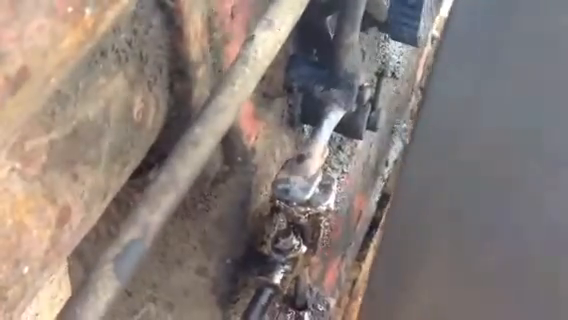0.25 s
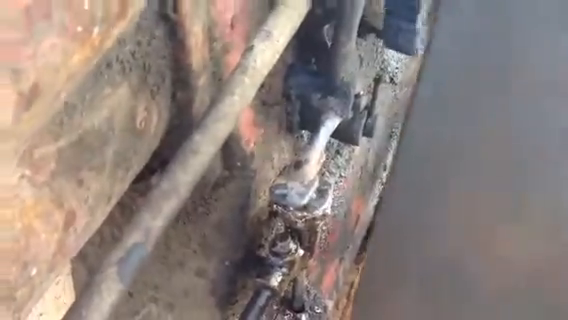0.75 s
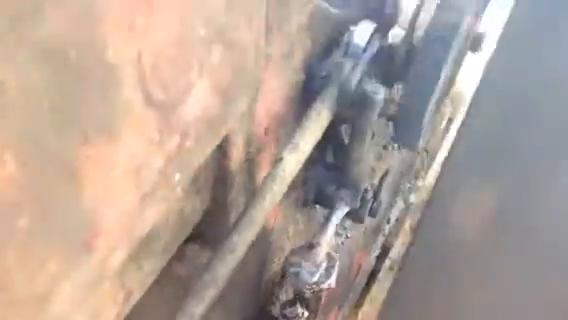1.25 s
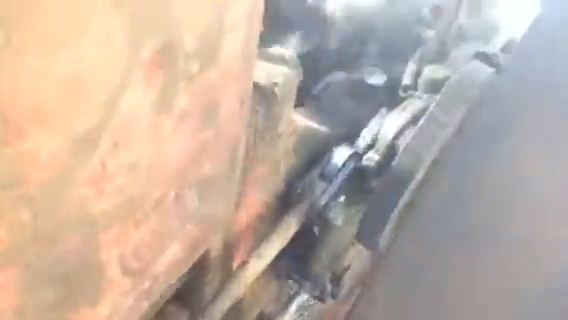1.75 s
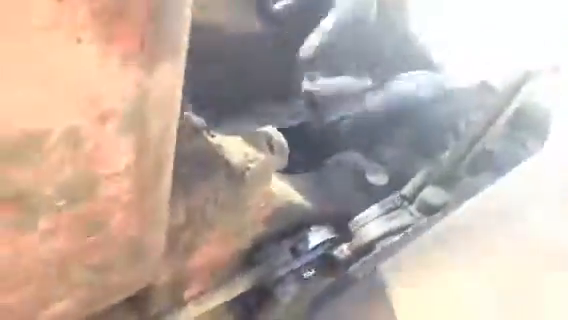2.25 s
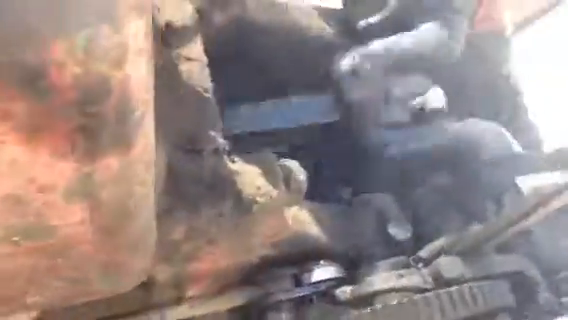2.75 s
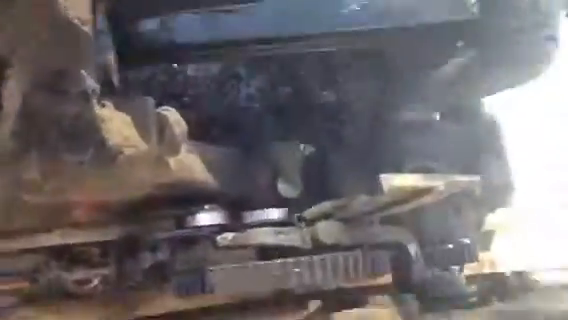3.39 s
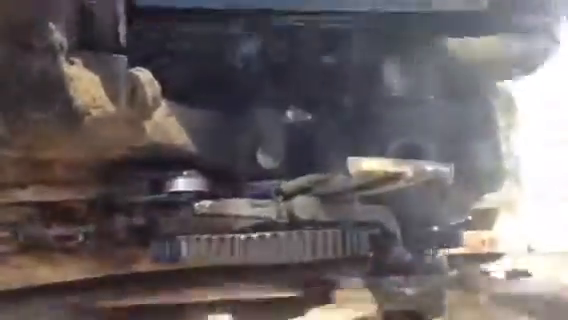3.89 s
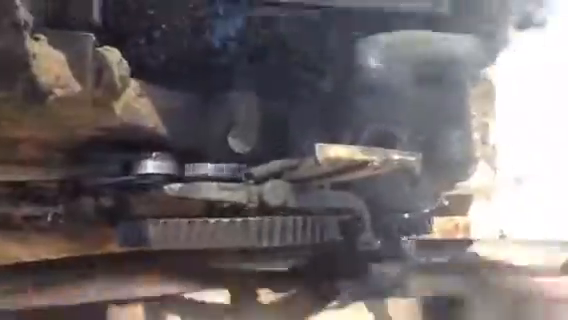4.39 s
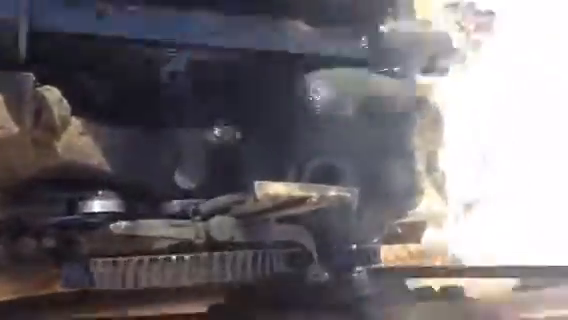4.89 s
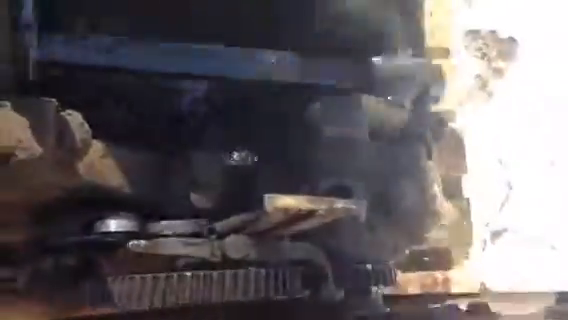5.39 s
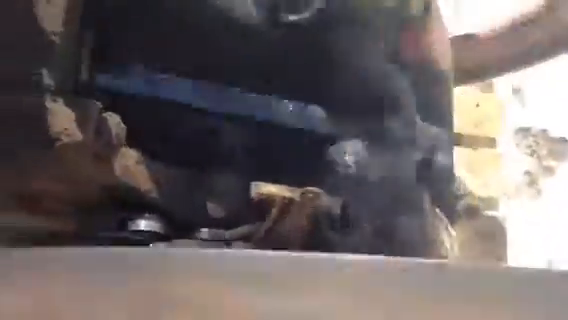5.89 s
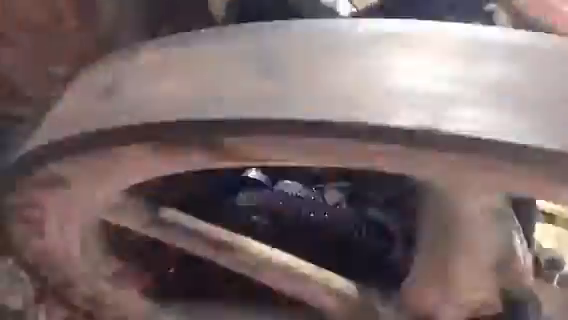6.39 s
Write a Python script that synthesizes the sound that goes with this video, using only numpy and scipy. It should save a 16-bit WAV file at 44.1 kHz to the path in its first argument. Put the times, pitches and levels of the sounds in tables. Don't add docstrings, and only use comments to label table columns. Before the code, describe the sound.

A handheld microphone passes very near heavy, worn machinery in open air. Deep knocks alternate with looser metal clunks, while sharp clacks, steel snaps and bell-like pawl pings come every other turn. Loose parts chatter and tick irregularly between, with soft puffs of leaking air. Early blows ring in a hollow iron hopper; later ones sound drier and boomier, with flywheel draught popping and buffeting. There is little echo, and the pace gradually eases.

```python
import sys
import numpy as np
from scipy import signal
from scipy.fft import rfft, irfft, next_fast_len
from scipy.io import wavfile
from scipy.ndimage import uniform_filter1d

SR = 44100
rng = np.random.default_rng(int(sys.argv[2]) if len(sys.argv) > 2 else 0)


def boost_factor(decibels):
    exponent = np.asarray(decibels, float) / 20
    return 10 ** exponent


def int16_out(signal):
    q = np.round(np.clip(np.atleast_2d(signal).T, -1, 1) * 32767)
    wavfile.write(sys.argv[1], SR, q.astype(np.int16))


N = 292824

EDGES = 28 * 2 ** np.arange(0, 9.4, 1 / 3)
CENTRES = np.sqrt(EDGES[1:] * EDGES[:-1])


def at_hz(points, hz):
    table = np.array(points)
    return np.interp(np.log(hz), np.log(table[:, 0]), table[:, 1])


def in_time(rows):
    s, *columns = np.transpose(rows)
    return [np.interp(np.arange(N) / SR, s, c) for c in columns]


def later(rows, lag_s):
    return np.array(rows)[:, :1] + lag_s


def rms_one(x):
    return x / np.sqrt(np.mean(x ** 2) + 1e-20)


def drift(rate):
    r = np.exp(-40 * np.pi * rate / SR)
    chance = rng.standard_normal(N // 20 + 2002)
    slow = signal.lfilter([1], [1, -2 * r, r * r], chance)[2000:]
    return np.interp(np.arange(N) / 20, np.arange(len(slow)), rms_one(slow))


def clicks(rows, db):
    out = np.zeros(N)
    out[(np.array(rows)[:, 0] * SR).astype(int)] = boost_factor(db)
    return out + 1e-18


def swell(x, rise_s, t60):
    a, r = np.exp(-1 / (max(rise_s, 1e-4) * SR)), boost_factor(-60 / (t60 * SR))
    return signal.lfilter([1 - a], np.convolve([1, -a], [1, -r]), x)


def one_band(noise, k):
    sos = signal.butter(2, EDGES[k:k + 2], "band", fs=SR, output="sos")
    return rms_one(signal.sosfilt(sos, noise))


def resonate(air, hz, width_hz):
    r = np.exp(-np.pi * width_hz / SR)
    for _ in range(2):
        air = signal.lfilter([1, 0, -1], [1, -2 * r * np.cos(2 * np.pi * hz / SR), r * r], air)
    return air


def whistle(start, end, hz, db, sharpness):
    i, k = int(start * SR), int(end * SR)
    out = np.zeros(N)
    air = resonate(rng.standard_normal(SR // 2), hz, hz / sharpness)
    out[i:k] = boost_factor(db) * rms_one(air[i - k:]) * np.sin(np.linspace(0, np.pi, k - i))
    return out


def is_inside(colour):
    return (CENTRES > colour[0][0]) & (CENTRES < colour[-1][0])


def shares_db(colour):
    db = at_hz(colour, CENTRES) + 10 * np.log10(np.diff(EDGES)) - 80 * ~is_inside(colour)
    return db - 10 * np.log10(np.sum(boost_factor(2 * db)))


def strike(rows, db, modes, spread_db, contact_s):
    out = 0
    for hz, level_db, t60 in modes:
        r, w = boost_factor(-60 / (t60 * SR)), 2 * np.pi * hz / SR
        soft = np.exp(-1 / (max(contact_s, 1 / hz) * SR))
        luck_db = spread_db * np.clip(rng.standard_normal(len(rows)), -2, 2)
        blow = clicks(rows, db + level_db + luck_db)
        contact = [(1 - soft ** 2) / 2, 0, (soft ** 2 - 1) / 2]
        blow = signal.lfilter(contact, [1, -2 * soft * np.cos(w), soft ** 2], blow)
        out = out + signal.lfilter([0, np.sin(w)], [1, -2 * r * np.cos(w), r * r], blow)
    return out


# (pitch [Hz], t60 [s])
IRON_T60 = [(80, 0.044), (300, 0.14), (800, 0.16), (2000, 0.091), (5000, 0.046), (14000, 0.064)]


def clatter(rows, knots_hz, colour, level_db, rise_s, length, touches):
    own = np.array(rows)[:, 1:]
    lags, losses_db = np.transpose([(0, 0), *touches])
    times = np.clip(later(rows, lags), 0, (N - 1) / SR).reshape(-1, 1)
    usual_db = level_db + shares_db(colour)
    bends = np.array([np.interp(np.log(CENTRES), np.log(knots_hz), o) for o in own - own.mean(axis=0)])
    power = np.zeros((len(CENTRES), N))
    for k in np.flatnonzero(is_inside(colour)):
        db = (usual_db[k] + bends[:, k, None] + losses_db).ravel()
        power[k] = swell(clicks(times, db), rise_s, length * at_hz(IRON_T60, CENTRES[k])) ** 2
    return power


def bands(grit_db, depth_db):
    grain = np.minimum(rng.exponential(1, (2, N)), 5)
    white = rng.standard_normal((2, N)) * boost_factor(grit_db * grain)
    size = next_fast_len(N)
    knots = 14 * np.arange(0, 95, .5) ** 1.6
    heights = np.minimum(rng.exponential(1, len(knots)), 2.5) / (1 + knots / 3500)
    peaks_db = depth_db * np.interp(np.arange(size // 2 + 1) * SR / size, knots, heights)
    white = irfft(rfft(white, size) * boost_factor(peaks_db), size)[:, :N]
    return [one_band(white[k % 2], k) for k in range(len(CENTRES))]


def iron(contacts, teeth):
    ragged = drift(220)
    power = teeth.copy()
    for k in range(len(CENTRES)):
        touch = .6 * ragged + .8 * np.roll(ragged, 5000 * (k + 1))
        power[k] += contacts[k] * boost_factor(2 * 4.2 * np.clip(touch, -2, 2))
    return np.sum(np.sqrt(power) * bands(grit_db=1.5, depth_db=9.0), axis=0)


# (share of cycle, level [dB])
SLIDING = [(0, 1), (.1, -3.5), (.2, 4.5), (.3, 2.5), (.4, 0), (.47, 3.5), (.55, 10.5), (.65, -1),
           (.75, 2.5), (.85, -1), (.93, 3), (1, 9)]
# (pitch [Hz], level [dB per Hz])
RATTLE = [(24, -54), (40, -19), (162, 10.5), (241, 6), (333, 6.5), (562, 1.5), (881, -6), (2010, -6),
          (2640, -13.5), (5440, -18.5), (6320, -23), (14400, -35.5), (15500, -53)]


def gear_teeth(rattle_db):
    knock_s = np.array(KNOCKS)[:, 0]
    turns = np.interp(np.arange(N) / SR, [-.16, *knock_s, 6.67], np.arange(len(KNOCKS) + 2))
    teeth_db = 1.6 * drift(25) + np.interp(turns / 2 % 1, *np.transpose(SLIDING))
    stray = clicks([(s, 0) for s in rng.uniform(0, N / SR, 400)], rng.normal(0, 4, 400))
    total = boost_factor(2 * teeth_db) + swell(stray, .0005, .025) ** 2
    power = np.zeros((len(CENTRES), N))
    for k, db in enumerate(shares_db(RATTLE)):
        patches_db = 2.5 * drift(12)
        power[k] = total * boost_factor(2 * (rattle_db + 7.0 + db + patches_db))
    return power


# (pitch [Hz], level [dB], t60 [s])
HOPPER = [(520, -10, 0.38), (575, 4.5, 0.25), (605, -23, 0.38), (647.3, -2.5, 0.22), (691.5, -7.5, 0.21),
          (706, -12.5, 0.17), (1847, -5.5, 0.085)]
# (pitch [Hz], level [dB], t60 [s])
HOPPER_LID = [(641, 4.5, 0.17), (794, -28, .25)]


def water_hopper(hum_db):
    knocks, returns, clacks = map(np.array, (KNOCKS, RETURNS, CLACKS))
    lag_s = .008
    blows = np.concatenate([knocks[:, [0, 2]], returns[:, :2] - [0, 4], clacks[:, :2] + [lag_s, -3.5]])
    near_db = .4 * (hum_db[(blows[:, 0] * SR).astype(int)] + 33)
    out = strike(blows, blows[:, 1] + near_db + 4.5, HOPPER, 1, 0.0022)
    shaken = [(s, 0) for s in rng.uniform(0, N / SR, 600)]
    out += boost_factor(hum_db - 8.5) * rms_one(strike(shaken, 0, HOPPER, 4.0, 0.0025))
    return out + strike(later(clacks[:3], lag_s), clacks[:3, 1] + 2.0, HOPPER_LID, 1.4, 0.0027)


# (time [s], level [dB] near 6000 Hz)
ROD_IN_VIEW = [(0, -8), (0.5, -10), (1.3, -11.5), (1.9, -5), (2.6, -5), (3.5, 2), (4.4, -1), (5.9, -0.5),
               (6.4, -6.5)]


def rod_view_db():
    return np.interp(np.array(RETURNS)[:, 0], *np.transpose(ROD_IN_VIEW))


# (time [s], peak level [dB])
PINS = [(0.0094, -15.5), (0.419, -21.5), (0.834, -19.5), (1.257, -19), (1.6873, -17.5), (2.12, -18),
        (2.561, -16.5), (3.0086, -16), (3.461, -17), (3.923, -17.5), (4.3921, -18.5), (4.8686, -18),
        (5.3524, -18), (5.8443, -17.5), (6.3473, -18)]
# (pitch [Hz], level [dB per Hz])
PIN_COLOUR = [(410, -32), (700, -26), (1160, 0), (1500, 0), (2710, -4.5), (3570, -9.5), (3850, -13.5),
              (5330, -10.5), (6440, -25), (14000, -67)]
# (pitch [Hz], level [dB], t60 [s])
PIN = [(1483, 2.5, 0.034), (2045, 3, 0.024), (2530, -18, 0.018), (3580, -3, 0.023), (4160, -10.5, 0.027)]


def wrist_pin():
    s, db = np.transpose(PINS)
    rows = np.transpose([s, db - np.mean(db), rod_view_db()])
    power = clatter(rows, [1600, 6000], PIN_COLOUR, -28.0, 0.0014, 1.0, [(.007, -13)])
    ring = strike(PINS, db - 3.0, PIN[:1], 0, 0.0016)
    return power, ring + strike(PINS, db - 6.0, PIN[1:], 2, 0.0017)


# (time [s], level [dB] near 600 Hz, level [dB] near 1600 Hz)
RETURNS = [(0.026, -22, -22), (0.4385, -24.5, -24.5), (0.855, -22.5, -21), (1.276, -20.5, -18.5),
           (1.709, -24, -19), (2.145, -23, -19.5), (2.585, -24.5, -15.5), (3.032, -24, -16),
           (3.486, -26, -17), (3.949, -21, -19.5), (4.42, -37, -19.5), (4.895, -26, -22), (5.379, -23, -23),
           (5.873, -24, -23.5), (6.375, -23.5, -25)]
# (pitch [Hz], level [dB per Hz])
RETURN_COLOUR = [(47, -69), (80, 1.5), (226, 3.5), (572, -3.5), (900, -13.5), (1170, 7.5), (1300, -5.5),
                 (1510, -4.5), (3080, -13.5), (4270, -16.5), (14000, -55)]
# (pitch [Hz], level [dB], t60 [s])
BED = [(221, -13, 0.046), (257, 1.5, 0.044), (361.8, -4.5, 0.11)]
# (pitch [Hz], level [dB], t60 [s])
ROD = [(1131, 0.5, 0.071), (1522, -2, 0.031), (1942, -6, 0.055), (2310, -16.5, 0.024), (666, -9, 0.065),
       (920, -28, 0.013)]


def rod_return():
    rebound_s, rebound_db = .011, -8.5
    s, low_db, mid_db = np.transpose(RETURNS)
    rows = np.transpose([s, low_db, mid_db, 1.2 * rod_view_db()])
    touches = [(rebound_s, -4), (.021, -9)]
    power = clatter(rows, [600, 1600, 6000], RETURN_COLOUR, -19.5, 0.00082, 0.53, touches)
    ring = strike(RETURNS, low_db + 5.5, BED, 4.5, 0.0025)
    ring += strike(RETURNS, mid_db + 3.1, ROD, 0.87, 0.00045)
    ring += strike(later(RETURNS, rebound_s), mid_db + 3.6 + rebound_db, ROD, 5.4, 0.00033)
    return power, ring


# (length [s], level [dB])
SQUEAKS = [(0.009, -36), (0.011, -40), (0.01, -41), (0.0072, -40), (.045, -43), (0.018, -48), (0.012, -42),
           (0.022, -65)]


def push_rod_squeak():
    return sum(whistle(s - length, s + 0.004, 3100, db, sharpness=90.0)
               for (s, *_), (length, db) in zip(CLACKS, SQUEAKS))


# (time [s], level [dB] near 600 Hz, near 1600 Hz, near 6000 Hz)
CLACKS = [(0.0989, -20, -7.5, -19.5), (0.927, -21, -12, -24), (1.783, -22, -7.5, -21.5),
          (2.659, -21, -9.5, -25.5), (3.563, -21, -11.5, -22.5), (4.494, -26.5, -12, -24),
          (5.457, -24, -16.5, -25.5), (6.451, -29, -14, -29.5)]
# (pitch [Hz], level [dB per Hz])
CLACK_COLOUR = [(150, -21.5), (250, -21.5), (599, -18.5), (1130, -21), (1820, -20), (2060, -16),
                (2800, -20.5), (4150, -20), (4520, -16), (4930, -25), (8970, -33.5), (15000, -82)]
# (pitch [Hz], level [dB], t60 [s])
ROCKER = [(518.8, 0.006, 0.16)]
# (pitch [Hz], level [dB], t60 [s])
VALVE_GEAR = [(1800, -1, .09), (2500, -6, .05), (2870, -4, .06), (5200, -8, .035), (6080, -8, .03),
              (3110, -7, .07), (7150, -8, .03), (8720, -6, .02)]


def valve_clack():
    clacks = np.array(CLACKS)
    power = clatter(CLACKS, [600, 1600, 6000], CLACK_COLOUR, -15.0, 0.0008, 0.93, [(.005, -7)])
    ring = strike(clacks, clacks[:, 1] + 5.2, ROCKER, 0.19, 0.0075)
    ring += strike(later(clacks, .004), clacks[:, 3] + 4.7, VALVE_GEAR, 1.2, 0.00095)
    return power, ring


# (time [s], level [dB])
TRIPS = [(0.1, -39), (0.2643, -15), (1.0968, -15), (1.954, -14), (1.988, -32), (2.8331, -15), (2.847, -26),
         (3.7447, -14.5), (4.6819, -17.5), (5.6504, -26.5), (6.6364, -44)]
# (time [s], level [dB])
LATCH = [(0.1394, -39), (0.5402, -49), (0.9628, -28.5), (1.8163, -29), (2.2523, -28), (2.696, -26.5),
         (3.1408, -26), (3.6032, -23.5), (4.066, -25), (4.5384, -23.5), (5.016, -24), (5.5038, -26.5),
         (5.9935, -26.5), (6.4976, -31.5)]
# (time [s], level [dB])
TAPS = [(0.276, -18.5), (0.3631, -39), (1.85, -31.5), (3.0005, -24), (3.1084, -35), (3.704, -30),
        (0.4945, -47), (5.33, -42), (3.833, -29), (3.8515, -24), (4.339, -36), (4.766, -31), (5.4251, -32),
        (5.752, -36.5), (5.9715, -54), (6.4156, -35)]
# (time [s], level [dB])
FOLLOWER = [(0.308, -37), (0.7255, -38), (1.1418, -31), (1.5675, -30.5), (2.002, -31), (2.4402, -32.5),
            (2.8863, -31), (3.3378, -34.5), (3.797, -27), (4.2614, -35), (4.7356, -37.5), (5.212, -31),
            (5.7078, -40), (6.2043, -39.5)]
# (time [s], level [dB])
LINKS = [(0.5144, -43), (0.9143, -51), (1.031, -39), (3.78, -35), (4.485, -25), (1.0802, -23.5),
         (1.352, -40), (1.389, -32.5), (1.462, -33), (1.901, -34), (2.217, -37.5), (2.5477, -34.5),
         (2.623, -33.5), (2.791, -33), (3.372, -39.5), (3.7275, -18), (4.022, -27), (4.171, -30.5),
         (4.6477, -30), (4.716, -34), (4.959, -32.5), (5.127, -30.5), (5.234, -38), (5.438, -33),
         (5.622, -35), (5.635, -20.5), (5.692, -29.5), (5.927, -39.5), (5.949, -35), (6.119, -32.5),
         (6.188, -33.5), (6.306, -43.5), (6.631, -20)]
# (pitch [Hz], level [dB per Hz])
TICK_COLOUR = [(880, 1.5), (1500, 4), (2940, 4), (4350, 7.5), (5950, 5), (6890, -3.5), (10500, -12),
               (13900, -28), (15500, -40.5)]
# (pitch [Hz], level [dB], t60 [s])
LINK = [(2600, -11, .018), (3250, -7, .02), (3700, -9, .018), (4550, -11, .018), (5200, -9, .016),
        (5750, -7, .018), (6100, -9, .016)]


def small_ticks():
    kinds = [(TRIPS, (-7, 1.5, -13)), (LATCH, (-9.5, 4.5, -9.5)), (FOLLOWER, (-4, 5.5, -10)),
             (LINKS, (-7.5, -3, -27)), (TAPS, (-2, -14, -27.5))]
    rows = np.array([(s, *(db + np.array(tilt))) for table, tilt in kinds for s, db in table])
    power = clatter(rows, [3000, 6000, 11000], TICK_COLOUR, -32.0, 0.00081, 0.73, [(.007, -17.5)])
    return power, strike(LINKS, np.array(LINKS)[:, 1] + 3.0, LINK, 2.5, .001)


# (time [s], peak level [dB] near 8000 Hz, near 3000 Hz)
SNAPS = [(0.101, -13, -14), (.1018, 1, -7.5), (.107, -28, 3), (.1106, -40, -16), (.2626, -15, -25),
         (.2674, -15, -9), (.2748, -23, -29), (.9312, -13, -2.5), (.9356, -33, -10), (1.0956, -25, -36),
         (1.1002, -14, -7), (1.108, -15, -14), (1.7822, -26, -8), (1.7882, -25, 2), (1.9534, -22, -22),
         (1.958, -32, -12), (1.9654, -29, -15), (2.66, -24, -17), (2.6652, -37, -12), (2.8344, -17, -37),
         (2.8398, -25, -21), (2.846, -27, -28), (3.5632, -33, -19), (3.5692, -30, -22),
         (3.7441, -14.5, -25), (3.7494, -12, -8), (4.0666, -16, -34), (4.4955, -9.5, -10),
         (4.5024, -34, -5), (4.681, -15.5, -29), (4.686, -26, -18), (5.4583, -11.5, -8), (5.6503, -24, -16),
         (5.6535, -23, -33), (6.452, -40, -26), (6.6385, -39, -15)]
# (pitch [Hz], level [dB], t60 [s])
SNAP_TOP = [(6470, -9, 0.01), (7400, -4.5, 0.0079), (8850, -3.5, 0.0056), (9370, -4.5, 0.0063),
            (10470, -22, .012), (12400, -24, .012)]
# (pitch [Hz], level [dB], t60 [s])
SNAP_BODY = [(2120, -16, 0.011), (2780, -5.5, 0.013), (3380, -11, 0.013), (3680, -14, 0.0088),
             (5620, -24, 0.0092)]


def steel_snaps():
    _, top_db, body_db = np.transpose(SNAPS)
    return strike(SNAPS, top_db, SNAP_TOP, 1.5, .0002) + strike(SNAPS, body_db, SNAP_BODY, 1.6, 0.00029)


# (time [s], level [dB])
PAWL = [(0.1044, -14), (0.9373, -16.5), (1.0835, -36), (1.788, -13), (2.254, -31), (2.663, -30),
        (3.5717, -16.5), (3.726, -14.5), (4.5008, -22), (4.5416, -25.5), (5.461, -23), (5.622, -35),
        (5.6359, -19.5), (6.456, -41)]
# (pitch [Hz], level [dB], t60 [s])
PAWL_MODES = [(4580, 0, .04), (4440, -5, .03)]


def pawl():
    return strike(PAWL, np.array(PAWL)[:, 1] + 2.0, PAWL_MODES, 1, 0.00038)


# (time [s], level [dB] near 200 Hz, near 600 Hz, near 1600 Hz)
KNOCKS = [(0.252, -21, -20.5, -20.5), (0.678, -19, -20, -21), (1.09, -18.5, -18, -13),
          (1.524, -16, -20.5, -17.5), (1.948, -18, -21, -10), (2.392, -17, -17.5, -18),
          (2.83, -13.5, -16, -17), (3.293, -12, -17, -14), (3.743, -14, -17, -14.5), (4.217, -10, -18, -14),
          (4.68, -12.5, -18.5, -20.5), (5.17, -12, -23.5, -18), (5.649, -14, -21, -16),
          (6.156, -13.5, -22.5, -18.5)]
# (pitch [Hz], level [dB per Hz])
KNOCK_COLOUR = [(35, -76), (60, -63), (140, -31), (225, 4), (325, 1.5), (615, -5.5), (827, -13), (1400, -4),
                (1570, -14), (2060, -11.5), (14000, -55.5)]
# (pitch [Hz], level [dB], t60 [s])
CRANKCASE = [(202, -36, 0.077), (326, -20, 0.2), (569, 3.5, 0.02), (350, -15.5, 0.21), (430, -2, 0.029),
             (1135, -9, 0.088), (1393, -9.5, 0.088), (1293, -27.5, 0.075), (642.7, -19.5, 0.19),
             (1697, -20, 0.098), (2070, -13, 0.049), (2487, -22, 0.057)]
# (pitch [Hz], level [dB], t60 [s])
SKID = [(80, 29.5, 0.0098), (133.3, 17, 0.084)]
# (pitch [Hz], t60 [s])
BOOMS = [(192, 0.14), (192, 0.12), (198.6, 0.16), (188, 0.13), (193.6, 0.18), (190, 0.097), (194, 0.16),
         (192.5, 0.14), (193.2, 0.15), (195.5, 0.086), (196, 0.12), (193, 0.14), (194.6, 0.127),
         (192.4, 0.18)]


def big_end_knock():
    low_db = np.array(KNOCKS)[:, 1]
    touches = [(-.006, -15), (.022, -18.5), (.04, -22.5)]
    power = clatter(KNOCKS, [200, 600, 1600], KNOCK_COLOUR, -12.0, 0.0012, 0.69, touches)
    ring = -strike(KNOCKS, low_db + 5.4, CRANKCASE, 1.0, 0.00066)
    ring += strike(KNOCKS, low_db - 16, SKID, 1.5, .004)
    for (s, db, *_), (hz, t60) in zip(KNOCKS, BOOMS):
        ring += strike([(s + 0.00048,)], db, [(hz - 1.5, 12.5, t60)], 0, .00066)
    t, slap_hz = np.arange(-300, 301) / SR, 437
    slap = -np.cos(2 * np.pi * slap_hz * t) * np.exp(-(2 * slap_hz * t) ** 2)
    ring += np.convolve(clicks(later(KNOCKS, 0.0036), low_db + 6.5), slap, "same")
    return power, ring


# (time [s], peak level [dB])
SEAT = [(0.3642, -33), (0.519, -40), (0.5372, -26.5), (0.563, -35), (1.367, -25), (1.38, -28),
        (2.0672, -33), (2.2233, -43), (2.2514, -31), (3.129, -27.5), (3.856, -25), (4.0316, -35),
        (4.048, -26.5), (4.994, -32), (5.972, -26.5), (5.9864, -40)]
# (pitch [Hz], level [dB], t60 [s])
SEAT_MODES = [(1882, -0.5, 0.055), (1973, -2, 0.047), (1490, -7, 0.033), (2930, -12, 0.038),
              (4500, -15, 0.046)]


def spring_seat():
    return strike(SEAT, np.array(SEAT)[:, 1] - 1.5, SEAT_MODES, 1.8, 0.0012)


LATCH_DROPS_S = [0.542, 1.379, 2.252, 3.141, 4.066, 5.014, 5.994]
# (pitch [Hz], width [Hz], level [dB], lag [s], length [s])
WHEEZE = [
    (1840, 540, -42.5, -0.0047, 0.05),
    (5900, 1800, -55, 0.084, 0.071),
]


def wheeze():
    t, out = np.arange(N) / SR, 0
    for hz, width_hz, db, lag_s, length_s in WHEEZE:
        air = rms_one(resonate(rng.standard_normal(N), hz, width_hz))
        puffs = sum(np.exp(-(2 * (t - s - lag_s) / length_s) ** 2) for s in LATCH_DROPS_S)
        out = out + boost_factor(db + np.clip(drift(20), -2, 2)) * puffs * air
    return out


# (start [s], end [s], level [dB])
DRAUGHT = [(2.131, 2.18, -27.5), (2.335, 2.427, -25.5), (2.396, 2.49, -18.5), (2.488, 2.547, -19),
           (2.585, 2.65, -50), (2.896, 2.905, -29), (2.966, 2.999, -9.5), (3.097, 3.102, -19.5),
           (3.454, 3.54, -23.5), (3.692, 3.733, -15), (3.817, 4.003, -32.5), (4.007, 4.069, -20),
           (4.21, 4.34, -36.5), (4.379, 4.448, -21), (4.427, 4.495, -19.5), (4.493, 4.59, -36),
           (4.89, 4.915, -14), (4.94, 4.999, -20), (5.686, 5.83, -38.5), (5.868, 5.888, -29),
           (6.066, 6.157, -69), (6.452, 6.496, -23)]
# (pitch [Hz], level [dB per Hz])
BUFFET = [(25, 5.5), (50, 3), (100, 6.5), (250, 0), (500, -3), (1000, -29.5), (2000, -23)]


def draught():
    t = np.arange(N) / SR
    gusts = boost_factor(-49.0)
    for start, end, db in DRAUGHT:
        gusts = gusts + boost_factor(db) * np.sin(np.pi * np.clip((t - start) / (end - start), 0, 1))
    white, wind = rng.standard_normal((2, N)), 0
    lumps_db = 4.16 * np.clip(drift(53.0), -2, 2)
    for k, db in enumerate(shares_db(BUFFET)[:19]):
        wind = wind + boost_factor(db + lumps_db * min(CENTRES[k] / 200, 1.5)) * one_band(white[k % 2], k)
    return gusts * rms_one(wind)


# (time [s], peak level [dB], pitch [Hz], push 1 or pull -1)
POPS = [(2.194, -12.5, 241, 1), (2.365, -4.5, 300, 1), (2.431, -20, 260, 1), (2.443, -8, 298, -1),
        (2.5144, -7.5, 306, 1), (2.911, -9.5, 248, 1), (2.979, 2.5, 340, 1), (3.7091, -8, 137, 1),
        (3.722, -21, 250, 1), (4.03, -5.5, 255, 1), (4.045, -11, 263, -1), (4.08, -13.5, 147, 1),
        (4.392, -8, 197, -1), (4.404, -8.5, 350, 1), (4.4851, -5, 346, -1), (4.942, -9, 308, -1),
        (4.972, -1, 388, 1), (5.751, -16, 200, 1)]


def eddy_pops():
    out, t = np.zeros(N), np.arange(-900, 900) / SR
    for s, db, hz, sign in POPS:
        spike = np.cos(2 * np.pi * hz * t) * np.exp(-np.abs(t) * 3 * hz)
        middle = int(s * SR)
        out[middle - 900:middle + 900] += np.sign(sign) * boost_factor(db) * spike
    return out


# (start [s], end [s], pitch [Hz], level [dB])
ROLLS = [(2.334, 2.39, 150, -23), (2.341, 2.387, 275, -21.5), (2.496, 2.542, 245, -25),
         (2.58, 2.66, 97, -34), (2.957, 3, 329, -21), (3.467, 3.511, 195.5, -17), (4.305, 4.349, 126, -28),
         (4.367, 4.48, 91, -33), (4.417, 4.44, 476, -23), (4.484, 4.615, 80, -35.5),
         (4.927, 4.955, 393, -19.5), (4.93, 4.972, 88, -36), (5.73, 5.82, 148, -25.5),
         (5.766, 5.867, 69, -32.5), (6.025, 6.139, 283, -36)]


def rolling_air():
    return sum(whistle(*row, sharpness=5.4) for row in ROLLS)


# (time [s], rattle level [dB], hopper hum level [dB])
RUNNING = [(0.0, -43.5, -36.5), (0.4, -49, -28.5), (1.05, -46.5, -28), (1.59, -46.5, -28.5),
           (3.22, -46.5, -74.5), (3.8, -47, -111), (4.79, -51.5, -78), (6.64, -51, -85)]


def scene():
    rattle_db, hum_db = in_time(RUNNING)
    contacts, out = 0, water_hopper(hum_db)
    for contact in (wrist_pin, rod_return, valve_clack, small_ticks, big_end_knock):
        power, ring = contact()
        contacts = contacts + power
        out += ring
    out += iron(contacts, gear_teeth(rattle_db))
    out += push_rod_squeak() + steel_snaps() + pawl() + spring_seat()
    out += wheeze() + draught() + eddy_pops() + rolling_air()
    return out[None]


def roll_off(x):
    return signal.sosfilt(signal.butter(12, 15790, fs=SR, output="sos"), x)


def record(dry):
    x = signal.sosfilt(signal.butter(3, 45, "high", fs=SR, output="sos"), dry)
    x = signal.sosfilt(signal.cheby2(10, 40, 15900, fs=SR, output="sos"), x)
    fall_db = 160 * np.arange(N) / SR
    held_db = np.maximum.accumulate(20 * np.log10(np.abs(x[0]) + 1e-9) + fall_db) - fall_db
    duck_db = 0.064 * np.maximum(held_db + 14.5, 0)
    x = x * boost_factor(-uniform_filter1d(duck_db, size=200))
    mix = 0.93 * np.tanh(x / 1.357)
    return roll_off(mix)


dry = scene()
out = record(dry)
int16_out(out)
```